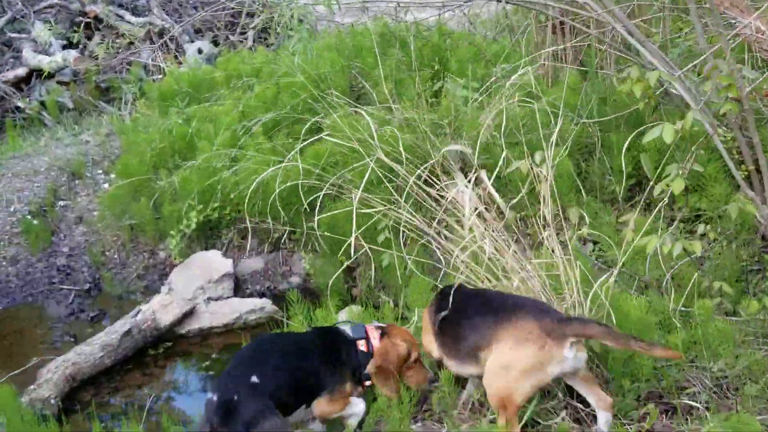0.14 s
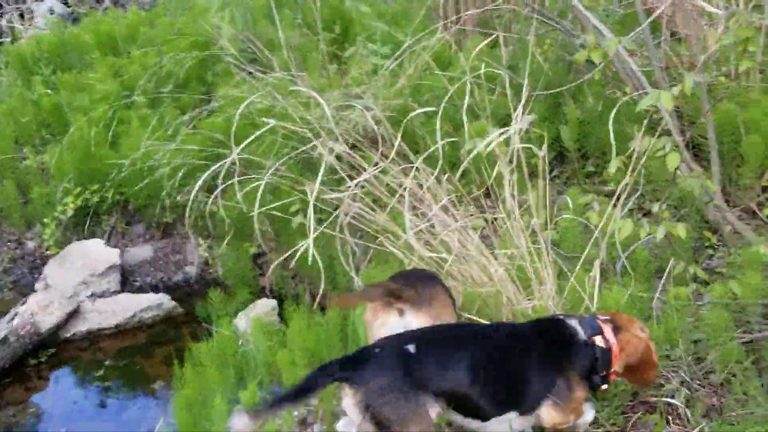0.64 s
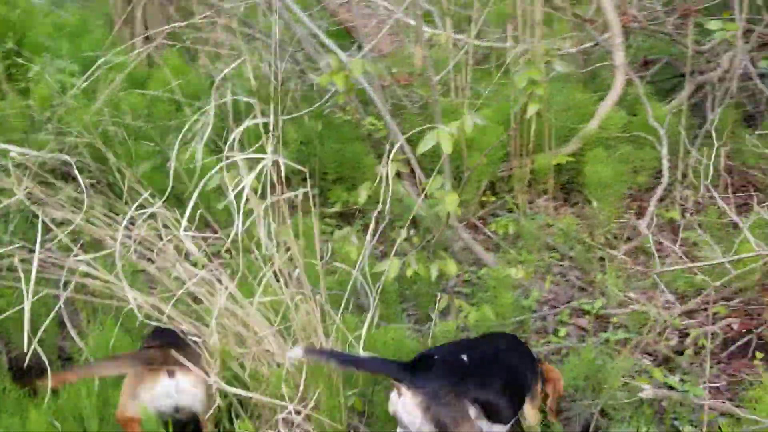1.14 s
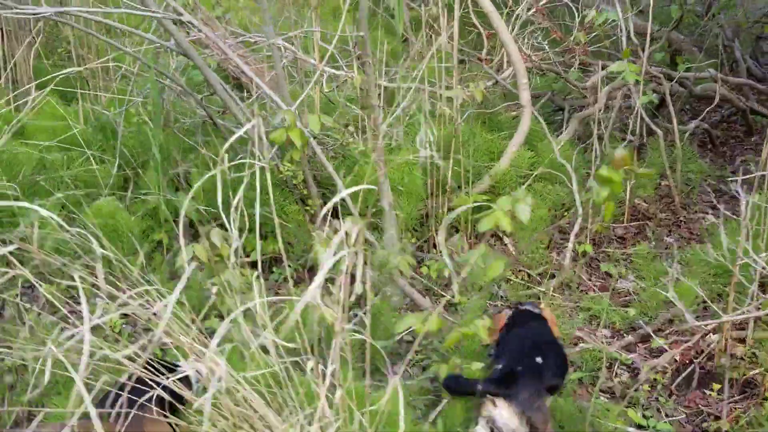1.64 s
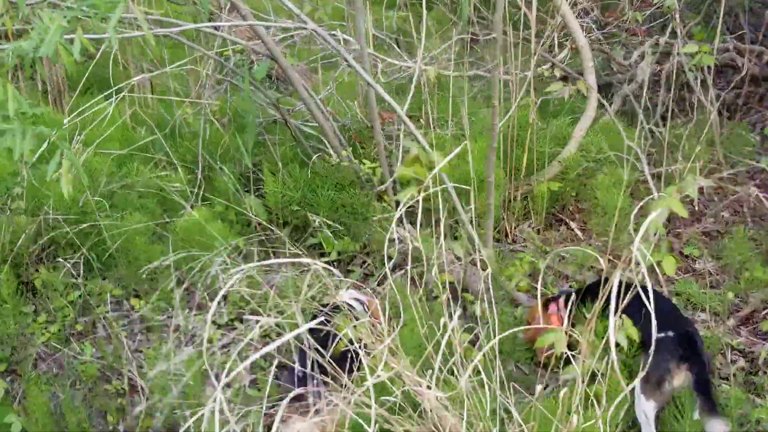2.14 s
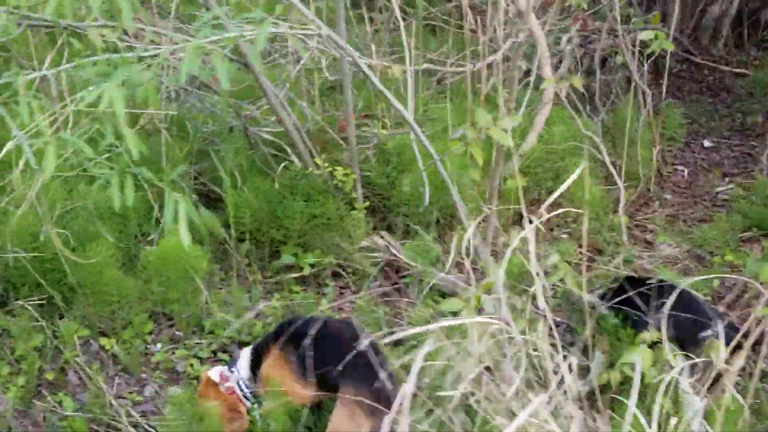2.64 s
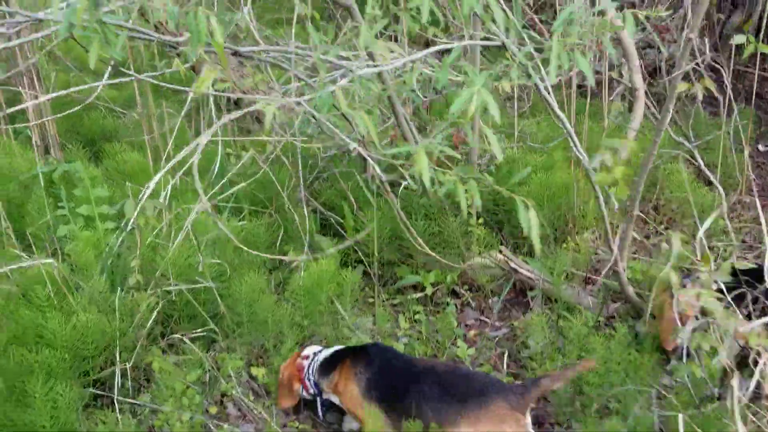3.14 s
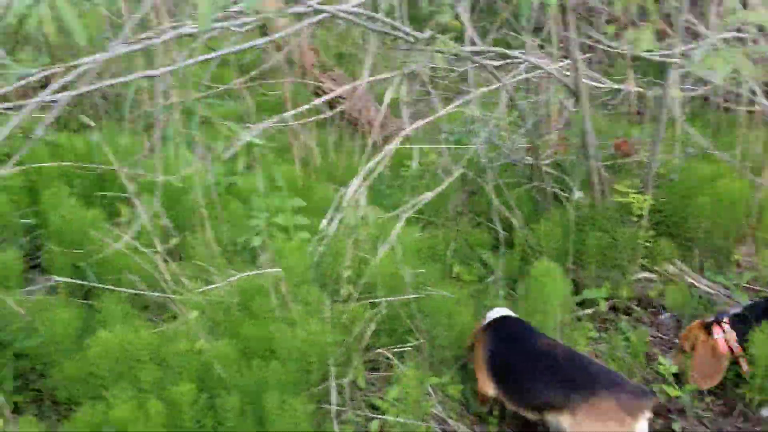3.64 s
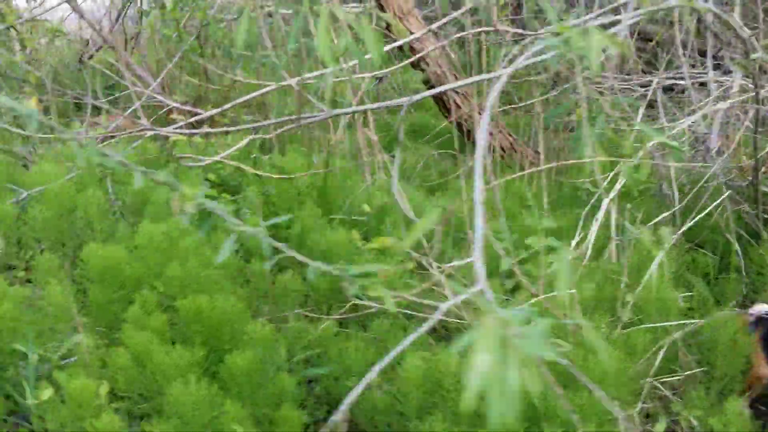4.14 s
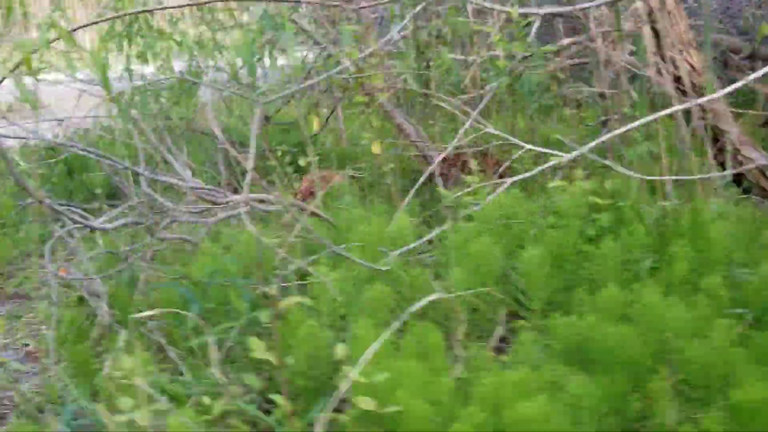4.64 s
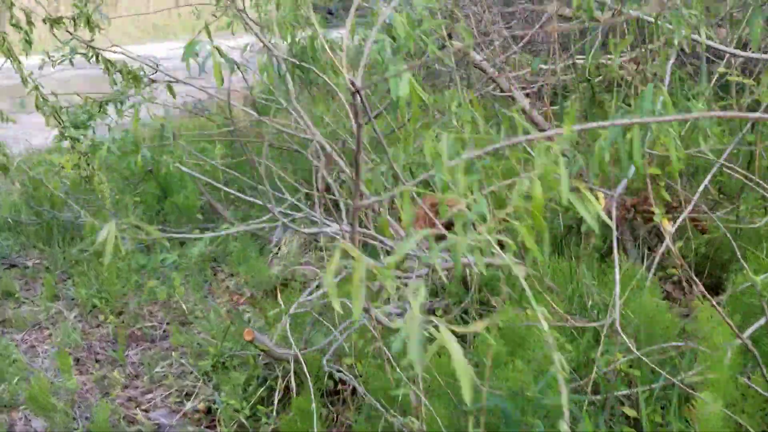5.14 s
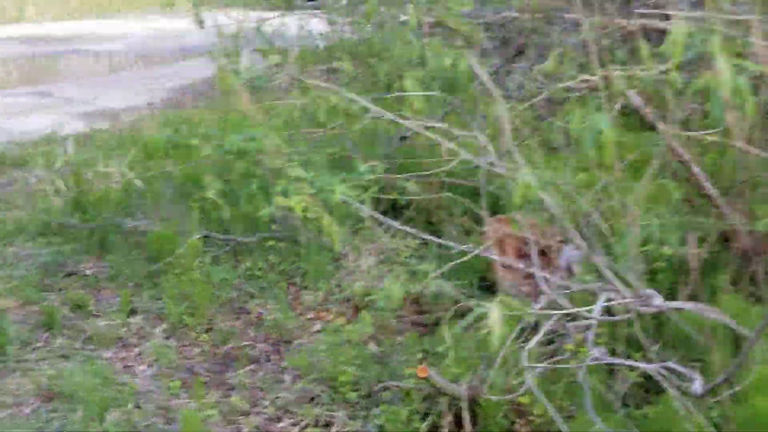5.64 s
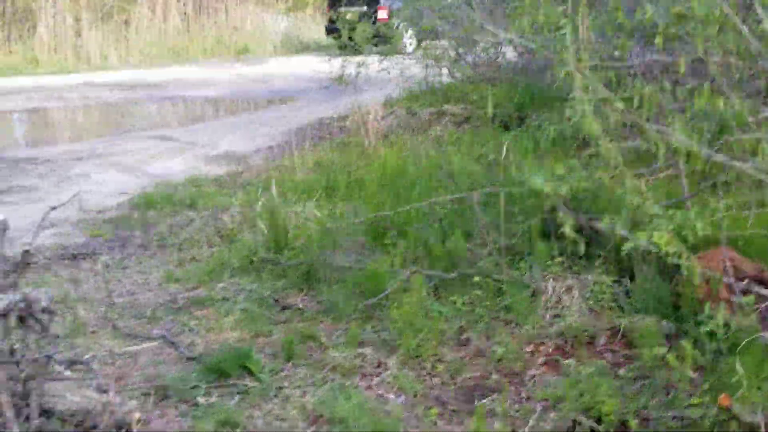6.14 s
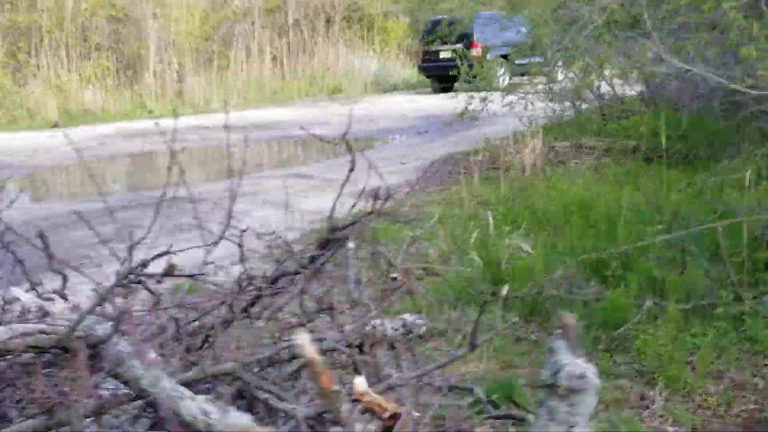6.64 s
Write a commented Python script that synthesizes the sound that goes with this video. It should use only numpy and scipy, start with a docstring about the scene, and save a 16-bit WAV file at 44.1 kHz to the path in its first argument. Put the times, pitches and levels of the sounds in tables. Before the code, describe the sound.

Rapid, yelping bays from a beagle-like dog on a trail, rough and cracking, with crackling brush and a few early wind buffets.

```python
"""A small hound bays in short bursts a few metres from a handheld phone, in brush out of doors, moving off right.
A steady chest tone and a gliding upper tone share its larynx: two harmonic stacks, rough when alike in strength.
Roughness shakes the partials and adds mixed tones and pulsed noise rung by the throat. Trees return a faint echo.
Dry stems rustle and snap as dense and single noise cracks; still air, a far low hum and windy gusts lie beneath."""
import sys
import numpy as np
from scipy import signal
from scipy.fft import rfft, irfft
from scipy.io import wavfile
from scipy.ndimage import uniform_filter1d, minimum_filter1d, map_coordinates

SR = 44100
rng = np.random.default_rng(int(sys.argv[2]) if len(sys.argv) > 2 else 0)


def store_wav(level_fs):
    """Save 16-bit WAV to argv[1]."""
    pcm = np.round(np.clip(np.atleast_2d(level_fs), -1, 1) * 32767)
    wavfile.write(sys.argv[1], SR, pcm.T.astype(np.int16))


def natural_amplitude(level_db):
    """Convert a level in decibels to a linear amplitude factor, elementwise."""
    exponent = np.asarray(level_db, float) / 20
    return 10 ** exponent


N = 297670
T = np.arange(N) / SR


def unit(x):
    """Scale to rms 1."""
    return x / np.sqrt(np.mean(x ** 2))


def curve(table):
    """A table of (time [s], value) read at every sample."""
    return np.interp(T, *np.transpose(table))


def walk(rate):
    """Random levels, rate of them a second, smoothed twice into a drift of rms 1."""
    hold = int(SR / rate)
    steps = np.repeat(rng.standard_normal(N // hold + 1), hold)
    return unit(uniform_filter1d(uniform_filter1d(steps, hold), hold)[:N])


def shaped(x, points):
    """Colour x with (frequency [Hz], gain [dB]) points joined on a log frequency scale."""
    hz, db = np.transpose(points)
    bins = np.fft.rfftfreq(x.shape[-1], 1 / SR) + 1  # + 1 keeps the log finite
    return irfft(rfft(x) * natural_amplitude(np.interp(np.log(bins), np.log(hz), db)), x.shape[-1])


def ring(x, hz, width):
    """A resonance passed twice, so its skirts are steep."""
    b, a = signal.iirpeak(hz, hz / width, SR)
    return signal.lfilter(b, a, signal.lfilter(b, a, x))


def track(tables, fade_s=.009):
    """A gate that is open during calls, and their columns on one time line."""
    gate, columns = np.zeros(N), np.zeros((len(tables[0][0]) - 1, N))
    for table in tables:
        s, *values = np.transpose(table)
        on = slice(int((s[0] - fade_s / 2) * SR), int((s[-1] + fade_s / 2) * SR))
        edge = np.clip(np.minimum(T[on] - s[0], s[-1] - T[on]) / fade_s + .5, 0, 1)
        gate[on] = np.maximum(gate[on], np.sin(np.pi / 2 * edge) ** 2)
        columns[:, on] = [np.interp(T[on], s, v) for v in values]
    return np.sqrt(2) * gate, columns  # a cosine of peak sqrt(2) has rms 1


def partials(hz, gains, rough, slip, steep, flutter_db):
    """A harmonic stack; roughness slips its phase, more on higher partials, and shakes each partial's size."""
    phase = 2 * np.pi * np.cumsum(hz) / SR
    slipped = slip * rough * walk(200)
    stack = 0
    for k, gain in enumerate(gains, 1):
        shake = natural_amplitude(flutter_db * rough * walk(70))
        stack = stack + gain * shake * np.cos(k * phase + k ** steep * slipped)
    return stack, phase + slipped


# passes through the stems: (start time [s], relative level [dB], decay [dB/s])
RUSTLE = [(-.02, -41, 24), (.7, -48, 10.5), (1.199, -57, 11.5), (1.83, -52.5, 32), (2.09, -48.5, 54),
          (2.47, -54, 22), (3.311, -64, 12.5), (3.63, -47.5, 60.5), (4.444, -51.5, 39), (5.039, -54.5, 50),
          (5.48, -49, 40), (5.71, -46, 52), (6.02, -50.5, 14.5), (6.6, -49, 66)]
# colour of the stems: (frequency [Hz], gain [dB])
STEM_COLOUR = [(300, -18.5), (1000, -2), (2500, -2), (5000, -3.5), (7000, -4.5), (9000, -11.5), (11000, -6),
               (13500, -2.5), (14500, -3.5)]


def rustle():
    """Dense tiny cracks of dry stems, each size of stem ringing in its own band and flickering alone."""
    rise_s, floor_db = .008, -59.5
    out, stir = 0, walk(25)
    for hz in 700 * 1.65 ** np.arange(7):
        sizes = natural_amplitude(3.3 * np.minimum(rng.exponential(size=N), 7))
        grains = rng.standard_normal((2, N)) * sizes
        flicker = natural_amplitude(2.4 * stir + 2.6 * walk(35))
        out = out + ring(grains, hz, hz / 1.4) * flicker  # neighbouring sizes overlap
    power = natural_amplitude(floor_db) ** 2
    for s, db, fade in RUSTLE:
        power = power + natural_amplitude(db - fade * (T - s)) ** 2 * np.clip((T - s) / rise_s, 0, 1)
    ports_gain = natural_amplitude(np.array([[6], [8]]))  # stronger on the right
    return unit(shaped(out, STEM_COLOUR)) * np.sqrt(power) * ports_gain


# colour of still air: (frequency [Hz], gain [dB])
AIR_COLOUR = [(25, -23), (70, -8.5), (270, -7), (700, -5), (1300, -9.5), (2500, -35), (5000, -45)]


def air():
    """Still outdoor air: shaped noise, its bass nearly alike at both ports, its level drifting."""
    mid, side = shaped(rng.standard_normal((2, N)), AIR_COLOUR)
    side = shaped(side, [(100, -7.0), (600, -7), (2500, 3.5)])
    return natural_amplitude(-56 + 2.0 * walk(1.3)) * unit(mid + side * np.array([[1], [-1]]))


# how the hum comes and goes, before its wavering: (time [s], level [dB])
HUM_LEVEL = [(0, -53), (1, -61.5), (1.8, -69), (2.6, -77.5), (6.75, -73.5)]


def hum():
    """A far low tone around 132 Hz that wavers in pitch and level, alike at both ports."""
    phase = 2 * np.pi * np.cumsum(132 + 3 * walk(18)) / SR
    return natural_amplitude(curve(HUM_LEVEL) + 3.0 * walk(12)) * np.cos(phase)


# squeaks before or after a bay: (start time [s], length [s], pitch [Hz], relative level [dB])
SQUEAK = [(0.027, .024, 1435, -7), (.782, .025, 1310, -18), (3.835, .04, 1256, -23),
          (4.779, .04, 1200, -32.5), (5.236, .045, 1380, -19), (5.352, .03, 1250, -25.5),
          (6.66, .06, 1208, -23.5)]


def squeaks():
    """Brief high notes that start soft and a little sharp, then hold: (time [s], pitch [Hz], level [dB])."""
    rise_s, rise_db, sharp = 0.01502, -18, 1.03
    return [[(s, hz * sharp, db + rise_db), (s + rise_s, hz, db), (s + length, hz, db)]
            for s, length, hz, db in SQUEAK]


# upper tone, which opens most bays and rides on through the hoarse parts:
# (start time [s], length [s], opening pitch [Hz], relative opening level [dB], closing pitch [Hz])
UPPER = [(.045, .105, 683.1, -13.5, 660), (.32, 0.041, 760, -33.5, 830), (.365, .11, 650, -17, 640),
         (.812, 0.12, 644.8, -16.5, 632.9), (1.251, .32, 632.5, -19, 790), (1.825, .157, 760, -15, 679.3),
         (2.136, .07, 640, -18, 740), (2.467, .133, 752.6, -16.5, 640), (3.304, .024, 640, -27, 760),
         (3.32, .12, 806.2, -14, 760), (3.619, 0.17, 680, -16.5, 720.2), (3.8, .042, 770, -26, 780),
         (4.068, .214, 700, -17, 850), (4.502, .13, 706.5, -21, 648.3), (4.687, .024, 700, -24, 680),
         (5.026, .133, 755.5, -17, 670.5), (5.466, .057, 747.8, -19, 731), (5.514, .095, 720, -13.5, 662),
         (5.612, .035, 660, -25.5, 653), (5.709, .035, 722.6, -24.5, 757), (5.854, .196, 700, -25.5, 820),
         (6.062, .13, 644, -28, 631.5), (6.388, .184, 790, -24.5, 850), (6.637, 0.028, 781, -28, 764)]


def upper_calls():
    """The upper tone swells and scoops up to its opening pitch, sinks towards rest, then glides to its close."""
    longest_rise_s, rise_db, scoop = .017, -9.5, .92
    settle_s, rest_hz, sag_db, end_db = .06, 640, -5.5, -10.5
    sink = .6  # share of the way from opening pitch to rest
    calls = []
    for s, length, hz, db, end_hz in UPPER:
        rise = min(longest_rise_s, length / 3)
        rest = min(rise + settle_s, length * .7)
        calls.append([(s, hz * scoop, db + rise_db), (s + rise, hz, db),
                      (s + rest, hz + sink * (rest_hz - hz), db + sag_db),
                      (s + length, end_hz, db + end_db)])
    return calls


# falls as the breath gives out: (start time [s], starting pitch [Hz], relative level [dB])
FALL = [(.165, 758.3, -20.5), (.478, 1005, -29.5), (.968, 953, -35), (1.612, 1079, -35.5),
        (2.236, 861.3, -18.5), (2.61, 816.3, -29), (3.468, 976, -25), (3.876, 1237, -21),
        (4.663, 978, -23.5), (5.39, 811.7, -39), (5.757, 787, -30), (6.72, 1100, -33.5)]


def falls():
    """The tone slides down and dies as the breath gives out."""
    length_s, rise_s, ratio, rise_db, end_db = .024, .009, .58, -5, -14.5
    return [[(s, hz, db + rise_db), (s + rise_s, hz * ratio ** (rise_s / length_s), db),
             (s + length_s, hz * ratio, db + end_db)] for s, hz, db in FALL]


# upper tone, one row per partial from the first: (relative level [dB])
UPPER_PARTIALS_DB = [5.5, -15.5, -21, -41]


def upper_tone():
    """Pitch and partial strengths of upper tone, squeaks and falls, all one vibration."""
    gate, (hz, db) = track(upper_calls() + squeaks() + falls())
    strength = uniform_filter1d(gate * natural_amplitude(db), size=130)
    return hz, np.outer(natural_amplitude(np.array(UPPER_PARTIALS_DB)), strength)


def share(pitch, first, centre_hz):
    """A moving resonance divides strength between two neighbouring partials."""
    width_hz = 322
    gains = np.array([1 / (1 + (2 * (k * pitch - centre_hz) / width_hz) ** 2) for k in (first, first + 1)])
    return gains / np.hypot(*gains)


# tongue, back 0 to forward 1: (time [s], place [0-1])
TONGUE = [(.1, 0.49), (.9, 0.38), (1.3, 0.16), (1.4, 0.23), (1.6, 0.83), (1.9, 0.26), (2.5, 0.58),
          (2.6, 0.21), (3.4, 0.24), (3.83, 0.52), (4.15, 0.06), (4.57, 0.25), (4.72, 0.76), (4.79, 0.5),
          (5.1, .55), (5.73, 0.76), (6.1, 0.51), (6.18, 0.51), (6.45, 0.8), (6.6, 0.5)]


def tongue_resonance():
    """The second resonance [Hz] climbs as the tongue moves forward."""
    return 1588 + 700 * curve(TONGUE)


# chest tone, one table a bay:
# (time [s], pitch [Hz], relative level [dB], mouth opening [0-1], brightness [dB])
CHEST = [
    [(.045, 543.1, -15.5, 0, -3), (.069, 554.7, -11.5, 0.41, -8.5), (.123, 571.1, -9, 0.63, -8),
     (.165, 560, -20, 0.73, -15)],
    [(.345, 545, -26, 0.4, -5), (.373, 547.6, -15.5, 0.38, -1.5), (.441, 554.9, -8.5, 0.49, -15.5),
     (.485, 534.4, -26, 0.72, -6)],
    [(.805, 562.6, -21, 0.56, -7.5), (.821, 559.8, -12.5, 0.43, -1), (.901, 546.8, -8.5, 0.59, -10),
     (.975, 538.7, -21.5, 0.73, -11.5)],
    [(1.27, 549, -19.5, 0.4, -1.5), (1.39, 501, -18, 0.54, -17.5), (1.54, 527.5, -13.5, 0.64, -9.5),
     (1.586, 568.4, -14, 0.72, -9), (1.61, 555, -12.5, 1, -16)],
    [(1.845, 537, -13.5, 0.6, -10), (1.875, 534.4, -18.5, 0.51, -14), (1.93, 527, -11.5, 0.38, -39),
     (1.96, 529.8, -11, 0.61, -22.5), (2.03, 557, -9, 0.53, -15.5), (2.065, 536.5, -10.5, 0.49, -21),
     (2.1, 563.5, -10, 0.57, -19.5), (2.14, 524.3, -12, 0.5, -16), (2.18, 549.7, -8.5, 0.6, -20.5),
     (2.231, 529.5, -14, 0.65, -12.5), (2.25, 528, -28.5, 0.3, -20)],
    [(2.485, 557, -27.5, 0.46, 12.5), (2.525, 560.8, -10, 0.2, -6), (2.591, 549.5, -15, 0.68, 0.5),
     (2.63, 514, -26, 0, -5.5)],
    [(3.325, 528.2, -20, 0.51, 3), (3.401, 530.1, -17, 0.53, -16), (3.459, 531.8, -11, 0.62, -9),
     (3.475, 519.3, -33, .56, -2)],
    [(3.645, 536, -20, 0.57, -2.5), (3.667, 530.6, -12.5, 0.66, -14.5), (3.745, 517, -13, 0.71, -29.5),
     (3.831, 538.9, -9.5, 0.99, -20.5), (3.86, 542, -35, 0.7, 5)],
    [(4.085, 520, -27, 0.44, -7.5), (4.121, 521.2, -9, 0.6, -10), (4.205, 533.1, -14, 0.59, -22.5),
     (4.27, 486.2, -19.5, 0.8, -7), (4.31, 477, -22, .8, -17.5)],
    [(4.52, 545, -22.5, 0.41, 3), (4.56, 543.6, -18, 0.51, -4), (4.632, 534.4, -17.5, 0.5, -16.5),
     (4.68, 520.4, -21, 0.64, -6.5)],
    [(4.695, 571.8, -15.5, 0.37, -7), (4.737, 587.7, -10, 0.42, -17), (4.785, 570.6, -12.5, 0.43, -11.5),
     (4.8, 572.4, -24.5, .15, -1.5)],
    [(5.05, 556.7, -19, 0.7, 0), (5.09, 528.4, -21.5, 0.46, -15), (5.162, 536.3, -12, 0.71, -17),
     (5.19, 533.8, -31.5, 0.46, -9)],
    [(5.27, 560.4, -15.5, .14, -25.5), (5.3, 574.6, -9.5, 0.34, -11), (5.36, 587, -13, 0.52, -12)],
    [(5.49, 519, -21, 0.25, -11), (5.584, 535, -19, 0.44, -27), (5.625, 540.2, -18.5, 0.51, -5.5),
     (5.655, 587, -22, 0.57, -0.5), (5.728, 547.9, -25.5, .33, 2.5), (5.75, 532.3, -38.5, 0.5, 3)],
    [(5.87, 499, -36, 0.2, 5), (5.896, 494.8, -25, 0.17, -3.5), (5.986, 532.3, -29, 0.59, 1),
     (6.084, 557.2, -18.5, .49, -3), (6.176, 575.2, -19.5, 0.54, -6), (6.2, 583, -26.5, 1, -12)],
    [(6.41, 552, -25, 0, -4), (6.44, 558, -24.5, 0.4, -18), (6.558, 547.4, -29.5, 0.51, 1.5),
     (6.636, 549.2, -20.5, 0.58, -13.5), (6.67, 542, -34, 0.55, 7.5)],
]
# chest partials 5-8, one row each: (level against partial 4 [dB])
TOP_PARTIALS_DB = [-15, -27.5, -30, -29.5]


def chest_tone():
    """Pitch and partial strengths: mouth opening weighs partials 1-2, the tongue 3-4; 5-8 follow the fourth."""
    gate, (_, db, mouth, bright_db) = track(CHEST)
    pitch = curve([row[:2] for bay in CHEST for row in bay])
    lower = share(pitch, first=1, centre_hz=484.6 + 700 * mouth)
    middle = share(pitch, first=3, centre_hz=tongue_resonance()) * natural_amplitude(bright_db)
    low = np.vstack([lower, middle]) * gate * natural_amplitude(db)
    return pitch, np.vstack([low, np.outer(natural_amplitude(np.array(TOP_PARTIALS_DB)), low[3])])


# throat resonances: (frequency [Hz], width of one pass [Hz], relative level [dB])
THROAT = [(693, 210, 5), (1098, 310, -4), (4040, 880, -57.5), (7170, 2000, -40)]


def throat_rasp(puffs):
    """Noise puffs rung by the throat; neighbouring resonances have opposite sign."""
    return unit(sum((-1) ** k * natural_amplitude(db) * ring(puffs, hz, w) for k, (hz, w, db) in enumerate(THROAT)))


# where the dog is: (time [s], lag of the left port [samples])
BEARING = [(.03, -5.5), (.11, 1.5), (.41, 4.5), (.89, 4.5), (1.34, -2), (1.52, -2.5), (2.12, 4), (2.55, -6),
           (3.4, 2.5), (3.83, 6), (4.19, 8.5), (4.75, 15.5), (5.32, 15.5), (5.54, 14), (5.96, 18.5),
           (6.4, 16.5), (6.61, 19.5)]


def bearing_lag():
    """Sound from the right reaches the left port later: that lag [samples]."""
    return curve(BEARING)


def ribcage(puffs, chest_phase):
    """A faint low murmur with a third-pitch undertone; the flank is heard more as the dog moves off right."""
    murmur = natural_amplitude(-38 + .5 * bearing_lag()) * unit(ring(puffs, 350, 250))
    return murmur + natural_amplitude(-44.5 + 3.1 * walk(40)) * np.cos(chest_phase / 3)


def hound():
    """Each tone is clear alone; the closer their strengths, the rougher both, with mixed tones and rasp between."""
    pitch, low = chest_tone()
    high_hz, high = upper_tone()
    strength = np.hypot(low[0], low[1])
    both = np.minimum(strength, high[0])
    rough = np.clip(1.7 * both / (np.maximum(strength, high[0]) + 1e-9), 0, 1)
    rough = uniform_filter1d(rough, int(.022 * SR))
    bright = low[2:4] * (rough + .09)
    low[2:] *= 1 - 0.71 * rough  # hoarseness trades the upper partials for noise
    chest, a = partials(pitch, low, rough + 0.19, slip=0.32, steep=1.39, flutter_db=3.0)
    upper, b = partials(high_hz, high, rough + .03, slip=.55, steep=1.2, flutter_db=3.5)
    mixed = natural_amplitude(-7.5) * np.cos(a + b) + natural_amplitude(-19) * np.cos(3 * a - b) + natural_amplitude(-21.5) * np.cos(2 * a + b)
    # irregular fold contact: noise let through once a cycle
    puffs = rng.standard_normal(N) * (1 + np.cos(a))
    breath = natural_amplitude(-34) * np.hypot(strength, high[0])
    rasp = (natural_amplitude(-3) * both + breath) * throat_rasp(puffs)
    hoarse = bright[0] * unit(ring(puffs, 1534, 440)) + bright[1] * unit(ring(puffs, 2000, 1100))
    # higher sums and differences of the two tones crowd the upper band with wavering lines
    crowd = bright[0] * (np.cos(4 * a - b) + np.cos(a + 2 * b))
    crowd += bright[1] * (np.cos(3 * a + b) + np.cos(2 * a + 2 * b) + np.cos(5 * a - b))
    voice = chest + upper + both * mixed + rasp + natural_amplitude(-9.5) * hoarse + natural_amplitude(-11.5) * rough * crowd
    voice = shaped(voice, [(2500, 0.0), (3100, -1.5), (4000, 0)])  # a slight dip near 3.1 kHz
    # a small mouth radiates little below its lowest resonance
    voice = signal.sosfilt(signal.butter(8, 485, "high", fs=SR, output="sos"), voice)
    return voice + low[0] * ribcage(puffs, a)


def at_ports(voice):
    """The voice reaches the two ports a few samples apart, with a slight level difference."""
    lag = bearing_lag() / 2
    pan_db = 0.0277 * lag
    return np.array([natural_amplitude(sign * pan_db) * map_coordinates(voice, [np.arange(N) - sign * lag], order=3)
                     for sign in (1, -1)])


def scatter(voice, db, t60_s, gap_s):
    """Scattered returns that die away by 60 dB in t60_s, different at each port, after a gap."""
    t = np.arange(int(.7 * SR)) / SR
    tail = rng.standard_normal((2, len(t))) ** 3 * natural_amplitude(-60 * t / t60_s) * (t > gap_s)
    tail = shaped(tail, [(300, -5.0), (1500, -4.0), (5000, -4.5)])
    tail = tail / np.sqrt(np.sum(tail ** 2, axis=1, keepdims=True))
    return natural_amplitude(db) * signal.fftconvolve(voice[None], tail, axes=1)[:, :N]


# buffets of wind: (time of peak [s], relative level [dB])
GUST = [(.12, -48), (0.349, -45.5), (.55, -38.5), (.72, -42.5), (.84, -45), (2.0, -66), (5.75, -61),
        (6.1, -64), (6.499, -63)]


def gust():
    """Wind buffets the ports: low noise, unrelated left and right, harder on the right."""
    noise = shaped(rng.standard_normal((2, N)),
                   [(20, -24.5), (60, -9.0), (130, -1.5), (250, -13.5), (500, -30.5)])
    # each swells and dies at 85 dB/s
    swell = np.sqrt(sum(natural_amplitude(db - 85 * np.abs(T - s)) ** 2 for s, db in GUST))
    return unit(noise) * swell * natural_amplitude(np.array([[-1], [4]]) + 3.1 * walk(24))


# snapping stems: (time [s], relative level [dB], ring frequency [Hz])
SNAPS = [(0.6357, -26, 6940), (0.7127, -27, 12400), (0.725, -32, 12800), (1.354, -30.5, 6600),
         (1.669, -32.5, 13820), (2.0878, -34, 3910), (2.8912, -33.5, 14200), (2.9337, -36.5, 11950),
         (3.2041, -38.5, 9100), (3.216, -31.5, 12200), (4.4504, -48.5, 12820), (5.046, -37, 9000),
         (5.4884, -33, 5590), (5.7142, -25, 3000), (5.732, -25.5, 5473), (5.823, -25, 13000),
         (6.0331, -30.5, 5063), (6.335, -38, 9020), (6.442, -38, 12000), (6.665, -39, 3600)]


def snaps():
    """Single stems snap: a short decaying noise crack plus its own broad ring."""
    out = np.zeros((2, N))
    t = np.arange(int(.03 * SR)) / SR
    for s, db, hz in SNAPS:
        crack = rng.standard_normal((2, len(t))) * np.exp(-t / 0.0054)
        crack = shaped(crack, [(500, -20.5), (3000, -5), (15000, 2.0)]) + 1.6 * ring(crack, hz, 2500)
        i = int(s * SR)
        out[:, i:i + len(t)] += natural_amplitude(db - 4.5) * crack
    return out


def scene():
    """The voice comes direct; ground and stems answer at once, trees later; brush, air, hum and wind join."""
    voice = hound()
    near = scatter(voice, db=-8, t60_s=0.021, gap_s=.001)
    trees = scatter(voice, db=-25.5, t60_s=0.32, gap_s=0.037)
    dog = at_ports(voice) * 1.073 + near + trees
    return dog + rustle() + snaps() + air() + hum() + gust()


def limit(x, hold_s=0.0036):
    """Gain that dips just ahead of any peak over full scale."""
    size = int(hold_s * SR)
    need = 1 / np.maximum(np.abs(x).max(axis=0), 1)
    return x * uniform_filter1d(minimum_filter1d(need, size=2 * size), size=size)


def low_pass(x):
    """Removes everything above the highest recorded frequency."""
    return signal.sosfilt(signal.butter(12, 15690, fs=SR, output="sos"), x)


def record(dry):
    """The phone cuts the top above 14.5 kHz, and a limiter holds the loudest peaks at full scale."""
    cut = signal.sosfilt(signal.ellip(8, .2, 60, 14500, fs=SR, output="sos"), dry)
    return low_pass(limit(cut))


dry = scene()
out = record(dry)
store_wav(out)
```